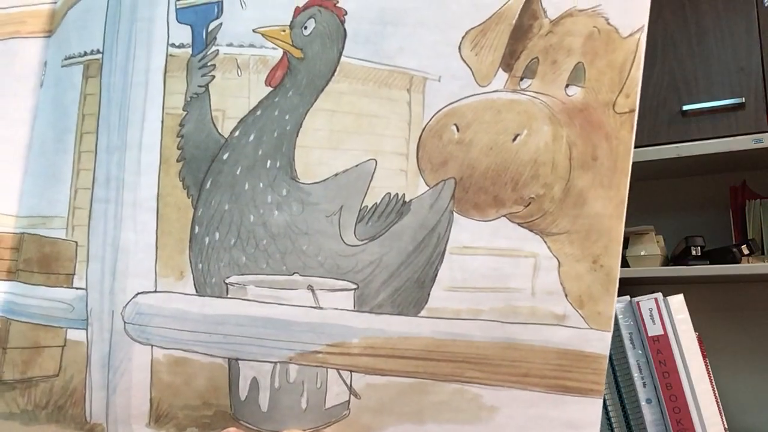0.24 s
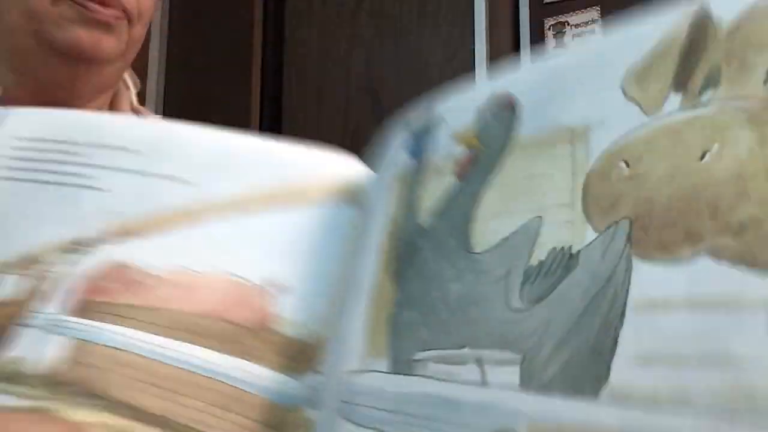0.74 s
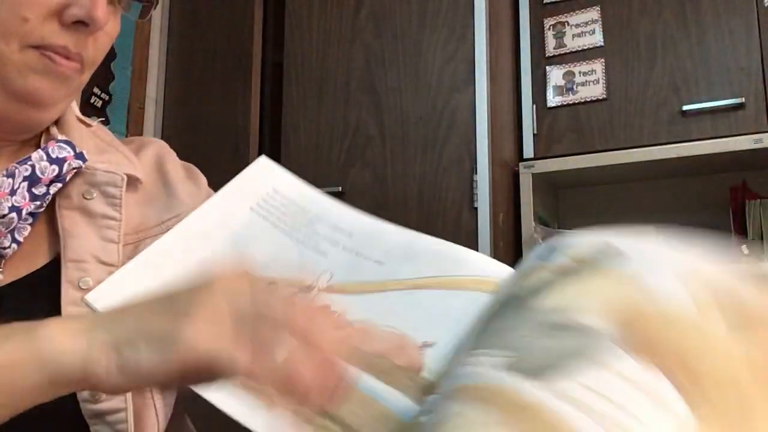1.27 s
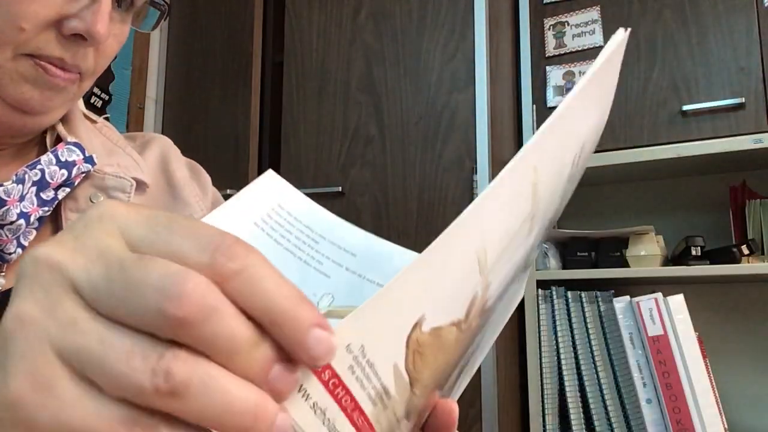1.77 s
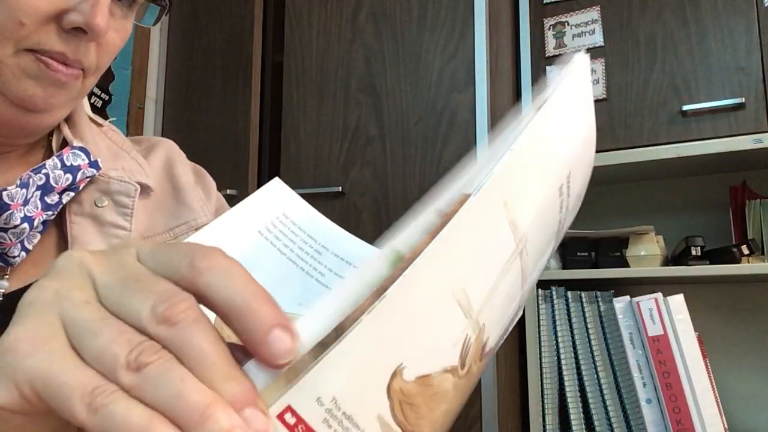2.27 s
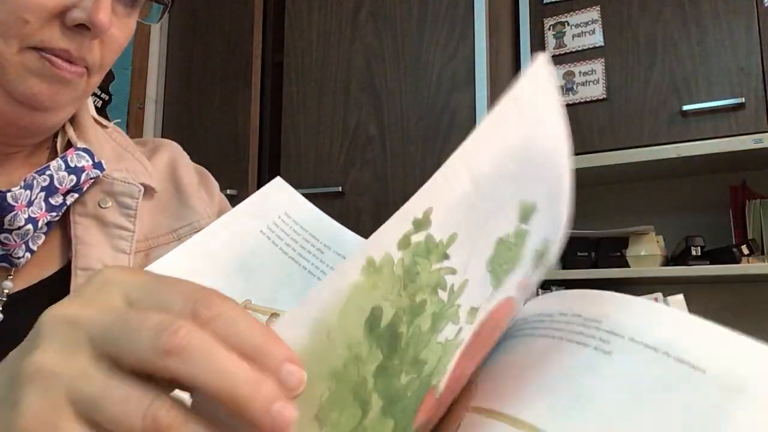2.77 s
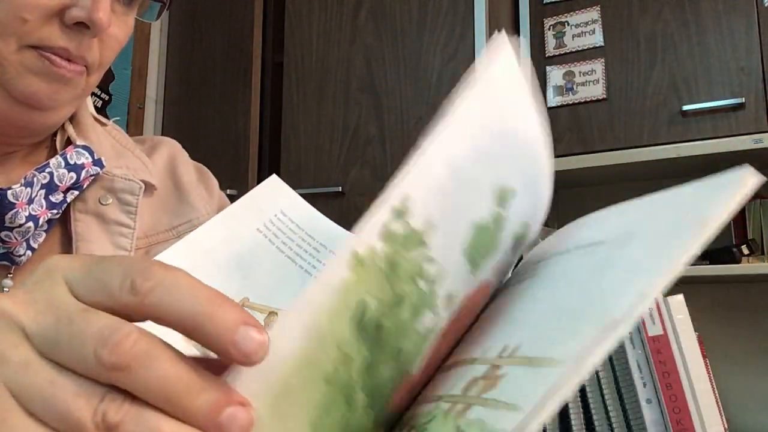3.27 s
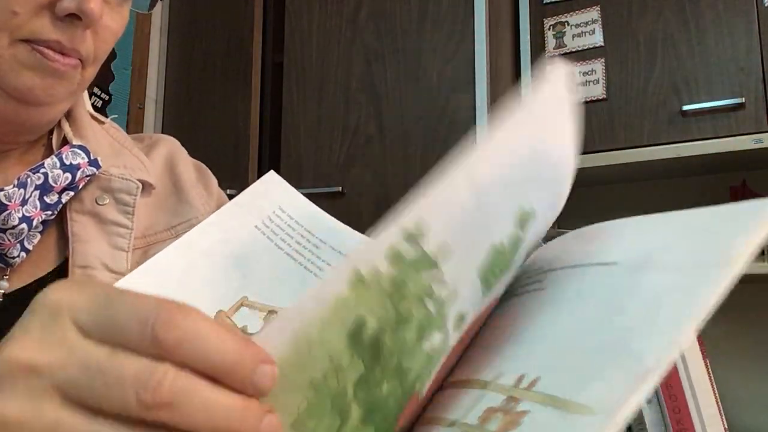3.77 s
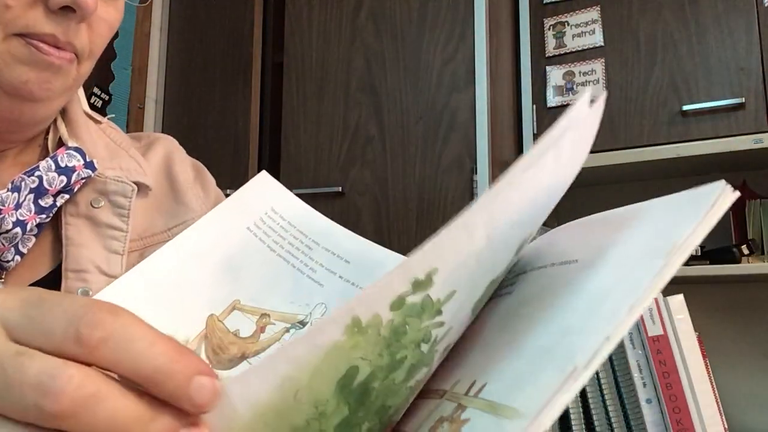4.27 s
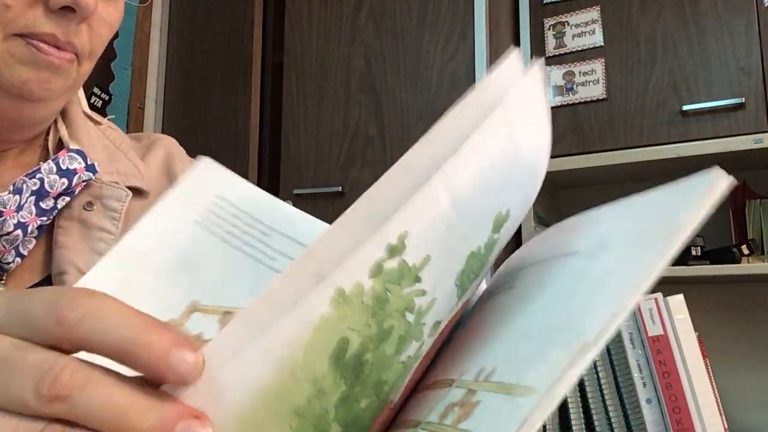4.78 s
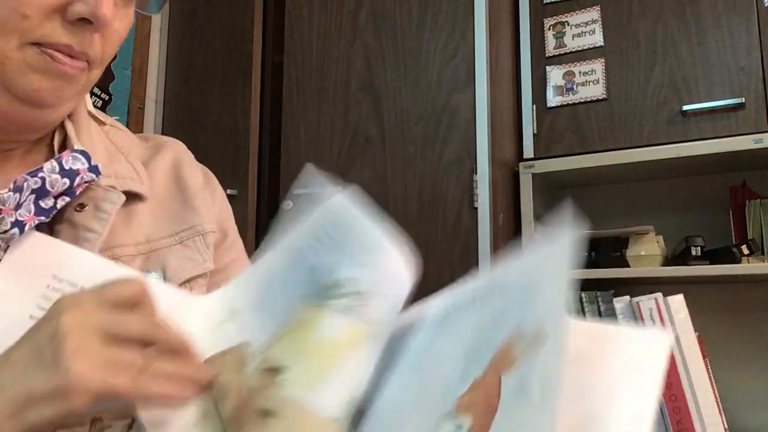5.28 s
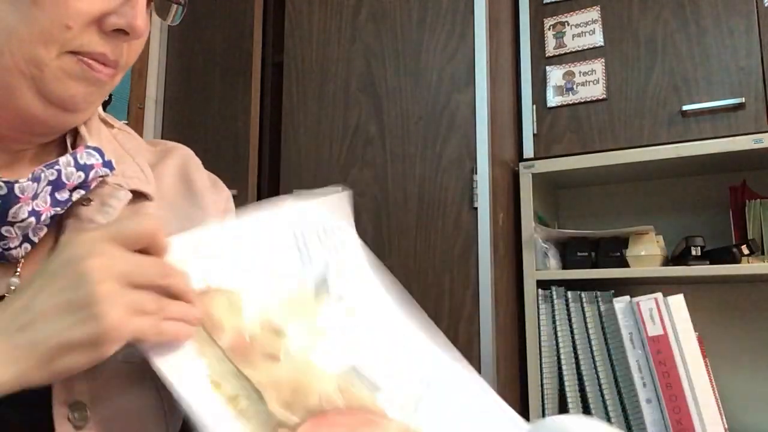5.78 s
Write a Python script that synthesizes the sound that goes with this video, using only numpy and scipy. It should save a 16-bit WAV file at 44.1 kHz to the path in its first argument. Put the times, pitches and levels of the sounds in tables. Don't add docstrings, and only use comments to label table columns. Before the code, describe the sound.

Close to the microphone in a quiet, slightly reverberant room, a hand leafs through a picture book. Faint paper creaks and scuffs come first, then a run of light edge flicks, a thicker bunch of pages fluttering down ever faster, brief skids and knocks, and finally sharp crackles and a loud crumple as the last page bends over. Low ventilation rumble lies beneath.

```python
import sys
import numpy as np
from scipy import signal
from scipy.io import wavfile
from scipy.ndimage import uniform_filter1d

SR = 44100
rng = np.random.default_rng(int(sys.argv[2]) if len(sys.argv) > 2 else 0)


def transcribe(signal):
    frames = np.atleast_2d(signal).T
    limited = np.clip(frames, -1, 1)
    pcm = np.round(limited * 32767).astype(np.int16)
    wavfile.write(sys.argv[1], SR, pcm)


def invert_db(x):
    u = np.asarray(x, float) / 20
    return 10 ** u


N = 265923

# start_s [s], snap_db [dB], flap_db [dB], drag_db [dB]
THIN_EDGES = [(0.737, -58, -60, -77), (0.965, -40.5, -73, -77), (1.451, -41.5, -66, -57),
              (2.006, -44, -72, -56.5), (2.051, -43.5, -79, -57), (2.098, -39.5, -78, -54),
              (2.158, -35.5, -64, -53.5), (2.198, -38, -68, -54), (2.245, -38, -79, -56.5),
              (2.291, -42, -79, -53.5), (2.322, -50, -73, -54.5), (2.348, -50, -72, -57.5),
              (2.372, -55, -64, -61), (2.401, -52, -62, -63), (2.492, -34.5, -60, -56),
              (2.52, -46, -66, -64), (2.938, -49, -63, -80), (3.059, -47, -90, -80),
              (3.1915, -43, -62, -57), (3.273, -30, -56, -51.5), (3.3366, -35, -50, -54.5),
              (3.4058, -40, -47, -54), (3.796, -31.5, -64, -66), (4.846, -31, -71, -51),
              (5.22, -38, -47, -52.5), (5.422, -42.5, -75, -66)]
# start_s [s], snap_db [dB], flap_db [dB], drag_db [dB]
BUNCH_EDGES = [
    (3.514, -31.5, -45, -52.5),
    (3.561, -28.5, -49, -52),
    (3.61, -25.5, -57, -54),
    (3.637, -27, -54, -58),
    (3.658, -32.5, -60, -57),
    (3.678, -36, -51, -67),
    (3.699, -35.5, -66, -68),
    (3.72, -51, -77, -70),
]
# start_s [s], snap_db [dB], flap_db [dB], drag_db [dB]
KNOCKS = [
    (4.7215, -38, -66, -75),
    (4.749, -42, -66, -75),
    (4.768, -46, -66, -75),
    (4.776, -39, -66, -75),
    (4.795, -46, -66, -75),
    (4.8155, -35, -64, -75),
]


def flicks(rows, rub_above_drag_db, puff, rustle, body):
    out, puffs, rubs, rattles = np.zeros((4, N))
    t = np.arange(4000) / SR
    gust = 1 / (1 + (t / 0.0061) ** 4) + 0.14 * np.exp(-t / 0.023)
    drag = 0.27 * np.exp(-t / 0.004)[::-1]
    airflow = np.r_[drag, gust]
    settle = np.minimum(t / 0.005, 1)
    for (s, snap_db, flap_db, drag_db), phase in zip(rows, rng.random(len(rows))):
        snap_turns = 0.763 * np.log(1 + t / 0.00029) + 21 * t + 0.11 * phase
        flap_turns = 0.7 * np.log(1 + t / 0.003) + 38 * t + 0.3 * phase
        snap = invert_db(snap_db - 5) * np.exp(-t / 0.0046 - (t / 0.011) ** 2) * np.minimum(t / 0.00011, 1)
        flap = invert_db(flap_db + 12.5) * (1 - np.exp(-t / 0.0053)) * np.exp(-t / 0.013)
        flap_wave = np.sin(2 * np.pi * flap_turns) + 0.55 * np.sin(4 * np.pi * flap_turns)
        tick = invert_db(snap_db - 9) * np.sin(2 * np.pi * 5500 * t) * np.exp(-t / 0.0001)
        add(out, s + 0.001184, snap * np.sin(2 * np.pi * snap_turns) + flap * flap_wave + tick)

        airflow_s = s + 0.00079 - len(t) / SR
        add(puffs, airflow_s, invert_db(drag_db - 0.5) * airflow)
        add(rubs, airflow_s, invert_db(drag_db + rub_above_drag_db - 10) * airflow)

        shaken = np.hypot(invert_db(snap_db - 13.5), invert_db(flap_db + 7))
        add(rattles, s, invert_db(-5) * shaken * np.exp(-t / 0.012) * settle)
    return out + puffs * puff + rubs * rustle + rattles * (body + 0.22 * rustle)


# start_s [s], level_db [dB], pitch_hz [Hz]
POPS = [(0.803, -51.5, 734), (0.843, -46.5, 501), (0.858, -44, 910), (0.874, -45, 686), (0.89, -51, 1380),
        (1.124, -47.5, 636), (1.157, -40.5, 2520), (1.261, -50, 625), (1.964, -40, 3300),
        (3.059, -47, 2190), (2.777, -39, 1540), (2.778, -41.5, 2880), (4.068, -51, 700),
        (4.42, -46.5, 2580), (4.629, -42, 1080), (4.644, -49, 807), (5.068, -39.5, 727),
        (5.106, -22.5, 1470), (5.1135, -20, 3870), (5.122, -31, 1490), (5.147, -34, 1460),
        (5.305, -31, 870), (5.319, -21.5, 2800), (5.326, -22, 2770), (5.337, -27, 885), (5.341, -27, 4300),
        (5.351, -37, 870), (5.374, -47, 818), (5.491, -51, 2960)]
# start_s [s], level_db [dB], pitch_hz [Hz]
CRUMPLE = [(5.784, -29, 1490), (5.796, -27.5, 1920), (5.806, -20, 1920), (5.809, -17.5, 1360),
           (5.814, -18, 2760), (5.822, -22, 1880), (5.827, -13, 2140), (5.8356, -14, 2350),
           (5.8385, -12, 4080), (5.8397, -13, 2960), (5.8451, -13.5, 3330), (5.849, -14, 1720),
           (5.856, -20, 1970), (5.864, -19.5, 2120)]
# start_s [s], level_db [dB], pitch_hz [Hz], fade_s [s]
SHIVERS = [(2.052, -43, 3950, 0.0086), (2.099, -47, 2180, 0.0045), (2.161, -46, 2920, 0.01),
           (3.659, -48, 6600, .006), (5.0, -45, 1400, .025), (5.03, -39.5, 1480, 0.02),
           (5.041, -40, 3000, 0.013), (5.295, -34, 910, 0.016), (5.328, -32, 900, 0.019),
           (5.366, -33, 1770, 0.0058), (5.836, -20.5, 6030, 0.0074), (5.838, -29, 780, 0.021),
           (2.007, -45, 600, 0.002), (2.1, -43.5, 690, 0.0054), (2.16, -38, 680, 0.002),
           (2.2, -44, 690, 0.0035), (2.494, -38.5, 614, 0.0051), (4.722, -37, 405, 0.0073)]
# start_s [s], level_db [dB], pitch_hz [Hz], fade_s [s]
CRACKS = [(5.1143, -12, 13300, .002), (2.4862, -29, 12000, .001), (3.528, -37, 11000, .002),
          (5.1138, -22.5, 6500, .0005), (5.3191, -12.5, 2970, .0005), (5.3184, -17, 5100, 0.00059),
          (5.797, -21.5, 3700, .001), (5.8062, -25, 4500, .0015), (5.8268, -19, 4500, .001),
          (5.8565, -21, 4600, .001), (5.1139, -16, 3800, .0005)]
# start_s [s], level_db [dB], pitch_hz [Hz], fade_s [s]
STRAYS = [(3.282, -40, 3000, .002), (3.295, -40, 3000, .003), (3.3372, -34, 1500, .002),
          (3.33, -54, 1500, .006), (1.94, -50, 3600, .02), (2.047, -48, 2200, .003), (2.94, -46, 400, .004),
          (4.786, -38, 1400, .002), (4.8458, -33, 2500, .0005), (3.2733, -33, 3300, .0006),
          (5.076, -38, 7000, .002), (5.104, -33, 6000, .002), (5.868, -24, 2600, .002),
          (5.822, -22, 2800, .002), (5.7, -48, 900, .002), (3.53, -40, 1300, .006),
          (3.578, -42, 1700, .004), (3.626, -42, 1300, .004), (3.4075, -33, 1300, .001),
          (3.407, -36, 3200, .0006), (4.866, -38, 2100, .003), (5.064, -37, 1100, .002),
          (5.071, -34, 1320, .002), (5.086, -31, 1400, .003), (5.087, -34, 3000, .002),
          (5.111, -24, 1400, .003), (5.117, -21, 1700, .002), (5.31, -33, 900, .003),
          (5.3185, -22, 6500, .0008), (5.32, -21, 950, .002), (5.324, -24, 2900, .002),
          (5.326, -26, 4300, .003), (5.34, -28, 2800, .003), (5.372, -29, 1800, .002),
          (5.788, -30, 1000, .002), (5.817, -19, 2900, .001), (5.8295, -17, 2000, .001),
          (5.8358, -9, 5000, .0005), (5.843, -13, 3000, .001), (5.846, -29, 9000, .002),
          (3.274, -38, 380, .001), (2.495, -35, 290, .002), (2.52, -42, 300, .002), (2.052, -44, 550, .002),
          (2.246, -41, 480, .002), (2.292, -45, 600, .002), (2.35, -47, 900, .002),
          (2.374, -48, 1000, .002), (2.401, -48, 1200, .001), (3.516, -39, 1200, .002),
          (0.85, -53, 1500, .01), (0.964, -44, 1300, .002)]
# start_s [s], level_db [dB], pitch_hz [Hz], fade_s [s]
HUMS = [
    (2.011, -46, 4900, .005),
    (2.06, -53, 3950, .02),
    (2.16, -46, 3950, .008),
    (2.16, -49, 2900, .008),
    (2.2, -46, 3700, .005),
    (2.203, -53, 2800, .015),
    (2.245, -45, 3400, .006),
    (2.245, -50, 1600, .003),
    (2.293, -51, 3900, .008),
    (2.325, -47, 1800, .006),
]


def pops(rows, damping):
    out = np.zeros(N)
    t = np.arange(2000) / SR
    ring = t[:200]
    for (s, db, hz, fade), (spatter, size) in zip(rows, rng.standard_normal((len(rows), 2, 2000))):
        clicks = spatter * invert_db(2.0 * size) * np.exp(-t / fade)
        clicks[0] = 0.034 / fade
        patch = np.sin(2 * np.pi * hz * ring) * np.exp(-ring * hz * damping)
        memory = np.exp(-hz / 4000)
        direct = signal.lfilter([1], [1, -memory], np.pad(clicks, (0, 199))) * (1 - memory)
        sound = np.convolve(clicks, patch) + 0.05 * direct
        add(out, s + 0.0004, invert_db(db - 7.5) * sound / abs(sound).max())
    return out


def with_fades(rows):
    return [(s, db, hz, 0.0046 * (hz / 1000) ** -0.21) for s, db, hz in rows]


# start_s [s], level_db [dB], bend_db from hissy to dull [dB], length_s [s]
SCUFFS = [(0.9445, -59.5, -9, 0.015), (1.119, -65, 11, .012), (1.963, -58, 0, 0.008),
          (2.487, -51, 18, .011), (2.609, -62.5, 0, 0.024), (3.234, -62.5, 21, 0.01),
          (4.2527, -56.5, -6, 0.019), (4.347, -67.5, 16, 0.01), (4.4033, -55.5, 10, .0084),
          (4.746, -46.5, -8, .015), (4.776, -44, -7, 0.013), (4.8152, -41.5, 0, 0.013),
          (4.845, -52.5, -4, 0.05), (5.0726, -51, 17, 0.017), (5.097, -41, -4, 0.014),
          (5.1145, -32, -8, 0.0075), (5.175, -36, -11, .023), (5.269, -43.5, -9, 0.0071),
          (5.319, -38.5, -12.5, .012)]
# start_s [s], level_db [dB], bend_db from hissy to dull [dB], length_s [s]
SKIDS = [
    (1.1578, -56, 1, .009),
    (4.005, -57.5, 12, 0.0094),
    (4.568, -42, -3, .014),
    (4.612, -43.5, -5.5, .011),
    (4.7194, -39.5, -6, 0.014),
    (5.7239, -41.5, -10.5, 0.036),
]
# start_s [s], level_db [dB], bend_db from hissy to dull [dB], length_s [s]
BUCKLES = [
    (5.805, -48, 13, 0.0088),
    (5.837, -38.5, 8, 0.012),
    (5.853, -52, 14, 0.013),
]


def scuffs(hiss, rustle, body):
    levels = np.zeros((3, N))
    t = np.arange(5000) / SR
    swell = np.minimum(t / 0.0022, 1) * (0.5 + 0.54 * np.minimum(t / 0.0072, 1))
    for rows, rustle_db in (SCUFFS, 2.5), (SKIDS, -10), (BUCKLES, 13.5):
        for s, slip_db, bend_db, length in rows:
            slip = swell * (1 / (1 + (t / length) ** 8) + 0.088 * np.exp(-t / 0.016))
            layer_db = slip_db - bend_db / 2 - 8.5, slip_db + rustle_db - 6, slip_db + bend_db / 2 - 9
            for level, db in zip(levels, layer_db):
                add(level, s - 0.002, invert_db(db) * slip)
    return (levels * [hiss, rustle, body]).sum(0)


# middle_s [s], level_db [dB rms],
# pitch_hz [Hz], reach_s [s]
STRAINS = [(.733, -62, 350, .006), (.783, -66, 1000, .002), (.8, -70, 4100, .006), (.857, -50, 950, .007),
           (.89, -64, 1400, .008), (.952, -63, 2800, .006), (1.08, -63, 450, .01), (1.12, -64, 1900, .003),
           (1.159, -60, 2500, .002), (2.05, -62, 2200, .003), (2.778, -50, 2000, .002),
           (3.175, -62, 1500, .002), (3.194, -57, 2500, .006), (3.194, -51, 330, .003),
           (3.236, -59, 1300, .005), (3.287, -65, 2300, .006), (3.418, -64, 2600, .004),
           (3.432, -61, 1300, .01), (3.54, -53, 900, .008), (3.582, -56, 900, .008), (3.63, -56, 900, .005),
           (3.685, -55, 1400, .004), (3.724, -61, 400, .004), (5.116, -36, 4000, .003),
           (5.15, -51, 1000, .004), (5.187, -43, 2500, .006), (5.208, -50, 2800, .004),
           (5.223, -47, 1900, .003), (5.224, -47, 900, .003), (5.234, -44, 160, .005),
           (5.272, -48, 1800, .003), (5.36, -53, 3500, .005), (5.81, -38, 1200, .004),
           (5.865, -40, 1300, .005), (5.881, -44, 1900, .004), (5.915, -54, 3500, .004),
           (4.843, -54, 170, .008), (4.873, -58, 190, .006), (5.068, -52, 420, .007),
           (5.095, -48, 3500, .004), (5.116, -46, 170, .008), (5.134, -50, 13000, .005),
           (5.195, -45, 1300, .004), (5.274, -48, 850, .004), (5.284, -55, 500, .005),
           (5.34, -44, 1700, .007), (5.354, -49, 420, .004), (5.735, -54, 900, .005),
           (5.764, -53, 800, .004), (5.924, -57, 900, .004),
           (.735, -54, 170, .005), (.862, -57, 400, .008), (1.456, -55, 170, .005), (2.496, -48, 180, .006),
         (2.654, -57, 350, .005), (2.94, -55, 200, .012), (3.187, -58, 400, .003), (3.198, -53, 170, .006),
         (3.338, -50, 420, .002), (3.545, -52, 400, .004), (3.814, -51, 170, .005), (4.735, -51, 420, .004)]


def strains():
    out = np.zeros(N)
    t = np.arange(-1500, 1500) / SR
    ring = np.arange(1200) / SR
    rows = STRAINS
    for (s, db, hz, reach), (spatter, size) in zip(rows, rng.standard_normal((len(rows), 2, 3000))):
        patch = np.sin(2 * np.pi * hz * ring) * np.exp(-ring * hz * 0.6) * np.minimum(ring * hz, 1)
        clicks = spatter * invert_db(4.0 * size) * np.exp(-(t / reach) ** 2)
        sound = np.convolve(clicks, patch)
        add(out, s + t[0], invert_db(db) * evened(sound) * np.sqrt(reach * SR / len(sound)))
    return out


# frequency_hz [Hz], level_db [dB]
SWAY = [(25, -10), (60, 1), (110, -0.5), (200, -4), (320, -9.5), (700, -56)]
REST_DB = [-87, -80.5, -77.5, -74.5]
# start_s [s], length_s [s], level_db at the middle [dB], swell_db start to end [dB], dullness_db [dB]
STROKES = [(0.5, 0.42, -75.5, 9, 2), (0.973, .2, -74.5, 9, -0.5), (1.19, .12, -75.5, -6, 2),
           (1.46, .02, -73, 1, 0), (1.515, .12, -74.5, -1, -5.5), (1.82, .33, -76.5, 1, 1.5),
           (2.2, 0.23, -67.5, 5, 3), (2.455, 0.088, -66, 6, 4), (2.619, 0.18, -65.5, -8.5, 2),
           (2.839, 0.17, -67, 0, 2), (3.063, .15, -73.5, 6, 8), (3.522, 0.28, -69.5, 5.5, 8),
           (3.83, 0.16, -73, -2, 10), (3.932, 0.27, -69, 2.5, 4.5), (4.25, 0.35, -78.5, -5, 12),
           (4.73, .09, -64, -6, 0), (4.846, .13, -60, -9, 2), (4.963, 0.12, -59, 9, 6),
           (5.123, 0.22, -54, 8.5, 3.5), (5.307, 0.22, -64.5, -14, 6), (5.548, .1, -68.5, 12, -3),
           (5.731, 0.06, -55.5, -3, -4.5), (5.807, .15, -48, -19, 26), (5.967, .1, -65.5, -3, 1)]
# middle_s [s], reach_s [s], level_db [dB], stiffness_db of sheet body above the low sway [dB]
HEAVES = [(0.868, 0.074, -65, 1.5), (1.13, 0.21, -65.5, -6.5), (1.55, 0.15, -65, -10.5),
          (1.96, .04, -75.5, 3), (2.32, 0.13, -63.5, -7), (2.65, 0.04, -71, 4), (2.76, 0.068, -74, 3.5),
          (2.89, .06, -62.5, 1.5), (3.12, 0.076, -75, 3), (3.33, 0.031, -62, -11), (3.428, 0.025, -66.5, 6),
          (3.6, 0.073, -53, -12), (3.75, 0.021, -62.5, 1), (3.95, 0.14, -74.5, -0.5),
          (4.17, 0.12, -70.5, -3), (4.43, 0.037, -63, -7.5), (4.635, 0.028, -65.5, 7.5),
          (4.77, 0.036, -55.5, 7), (4.825, 0.021, -55, 3), (4.91, 0.046, -67, 0), (5.128, 0.026, -52.5, -8),
          (5.22, 0.033, -56, -2), (5.335, 0.022, -56, 0), (5.37, 0.029, -67, 8), (5.075, 0.015, -66, 12),
          (5.69, .04, -78, 10.5), (5.79, 0.02, -57.5, -1), (5.85, 0.056, -62, 8.5), (5.96, 0.088, -72.5, 7)]


def slide():
    t = np.arange(0, N / SR + 0.01, 0.002)
    power = invert_db(np.array(REST_DB))[:, None] ** 2 * np.ones(len(t))
    for start, length, db, swell_db, dull_db in STROKES:
        progress = np.clip((t - start) / length, 0, 1)
        onset = np.clip((t - start) / 0.028 + 0.5, 0, 1)
        tail = np.exp(-np.maximum(t - start - length, 0) / 0.031)
        stroke = onset * tail * invert_db(db + swell_db * (progress - 0.5))
        layer_gain = invert_db(np.array([[-dull_db], [0], [-10], [-23]]))
        power += (layer_gain * stroke) ** 2
    for middle, reach, db, stiff_db in HEAVES:
        heave = invert_db(db - 7.5 * ((t - middle) / reach) ** 2)
        power[2:] += (invert_db(np.array([[stiff_db], [0]])) * heave) ** 2
    hiss = noise(HISS, 2.2, 2.0, comb_db=1.3)
    layers = hiss, noise(RUSTLE, 1.8, 3.0), noise(BODY, 2.2, 3.5), noise(SWAY, 2.2, 1.5)
    samples_s = np.arange(N) / SR
    return sum(np.interp(samples_s, t, np.sqrt(p)) * layer for p, layer in zip(power, layers))


# frequency_hz [Hz], level_db [dB]
HISS = [(1500, -55), (3500, -4.5), (5000, -2.5), (6500, 0.5), (8500, -3.5), (10500, -5), (13000, -3),
        (15000, -10.5), (16500, -11)]
RUSTLE = [(500, -18), (1200, -6.5), (1700, -2.5), (2400, -3.5), (3000, -2.5), (4200, -6.5), (6000, -15.5),
          (11000, -28)]
BODY = [(120, -13), (260, 1.5), (400, 1), (650, -2), (950, -4.5), (1500, -7), (2500, -20.5), (5000, -56)]
PUFF = [(2500, -36), (5000, 2), (7000, -1), (9000, -2.5), (11000, -2), (13000, 0.5), (15000, -14),
        (16500, -2.5)]


def sheet_noises():
    return noise(HISS, 1.8, 1.3), noise(RUSTLE, 2.2, 2.5), noise(BODY, 2.0, 3.0), noise(PUFF, 1.6, 2.3)


# frequency_hz [Hz], t60_s [s]
ROOM = [(100, 0.12), (1000, 0.15), (4000, 0.18), (12000, 0.18)]


def room(x):
    taps = np.zeros(SR // 2)
    at = np.arange(260, SR // 2 - 20, 20)
    taps[at + rng.integers(0, 20, len(at))] = rng.choice([-1., 1.], len(at))
    hz, t, z = signal.stft(taps, SR, nperseg=256)
    decay = invert_db(-60 * t / read(ROOM, hz)[:, None])
    tail = signal.istft(z * decay, SR, nperseg=256)[1]
    return signal.fftconvolve(x, tail / np.linalg.norm(tail))[:N]


# frequency_hz [Hz], level_db [dB]
AIR = [(15, -56), (25, -26), (43, -11), (59, -23), (120, -5.5), (186, -14), (286, -22), (355, -14),
       (386, -22.5), (595, -36), (7590, -41), (8690, -40.5), (16200, -50.5)]


def ventilation():
    return invert_db(-67.5 + 0.5) * noise(AIR, 0.88, 0.4)


def evened(x):
    return x / np.sqrt(np.mean(x ** 2) + 1e-20)


def read(points, hz):
    f, value = np.transpose(points)
    return np.interp(np.log(hz + 1), np.log(f + 1), value)


def add(mix, s, sound):
    part = mix[round(s * SR):][:len(sound)]
    part += sound[:len(part)]


def noise(spectrum, patchy_db, grain_db, comb_db=0):
    grit = invert_db(grain_db * evened(uniform_filter1d(rng.standard_normal(N), size=60)))
    hz, t, z = signal.stft(grit * rng.standard_normal(N), SR, nperseg=1024)
    patches = uniform_filter1d(rng.standard_normal(z.shape), size=14, axis=0)
    patches = uniform_filter1d(patches, size=4, axis=1)
    colour_db = read(spectrum, hz) + comb_db * np.cos(2 * np.pi * hz / 2170)
    z = z * invert_db(colour_db[:, None] + patchy_db * evened(patches))
    return evened(signal.istft(z, SR, nperseg=1024)[1][:N])


def scene():
    hiss, rustle, body, puff = sheet_noises()
    edges = flicks(THIN_EDGES, 8.5, puff, rustle, body) + flicks(BUNCH_EDGES, -2, puff, rustle, body)
    creases = pops(with_fades(POPS + CRUMPLE) + CRACKS, 0.46) + pops(SHIVERS, 0.22)
    paper = edges + creases + scuffs(hiss, rustle, body)
    book = paper + invert_db(-13.5) * room(paper) + slide()
    close = pops(STRAYS, 0.4) + pops(HUMS, 0.1) + flicks(KNOCKS, 0, puff, rustle, body)
    return (book + close + strains() + ventilation())[None]


def roll_off(x):
    return signal.sosfilt(signal.butter(12, 16510, fs=SR, output="sos"), x)


def record(dry):
    cut = signal.butter(4, 54, "highpass", fs=SR, output="sos")
    top = signal.firwin(255, 16000, window=("kaiser", 8), fs=SR)[None]
    mix = signal.oaconvolve(signal.sosfilt(cut, dry), top, "same")
    return roll_off(mix)


dry = scene()
out = record(dry)
transcribe(out)
```